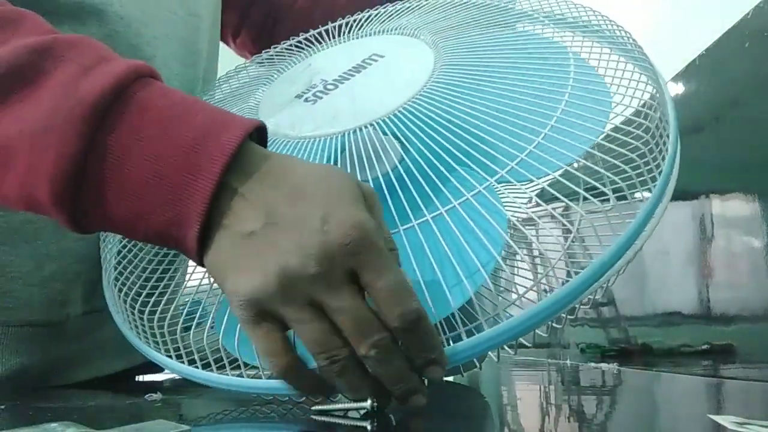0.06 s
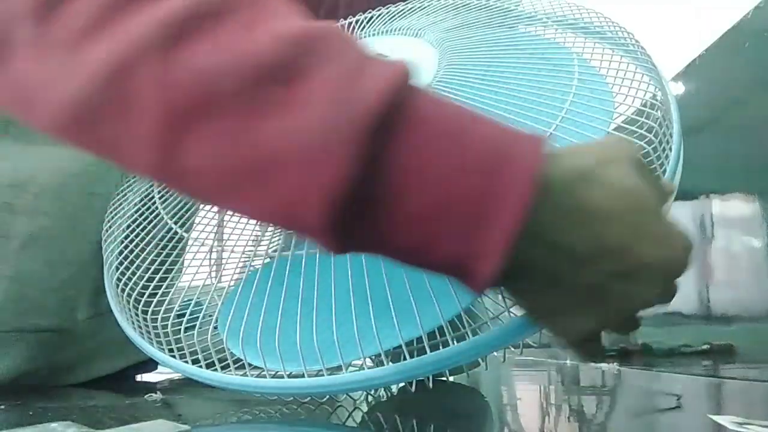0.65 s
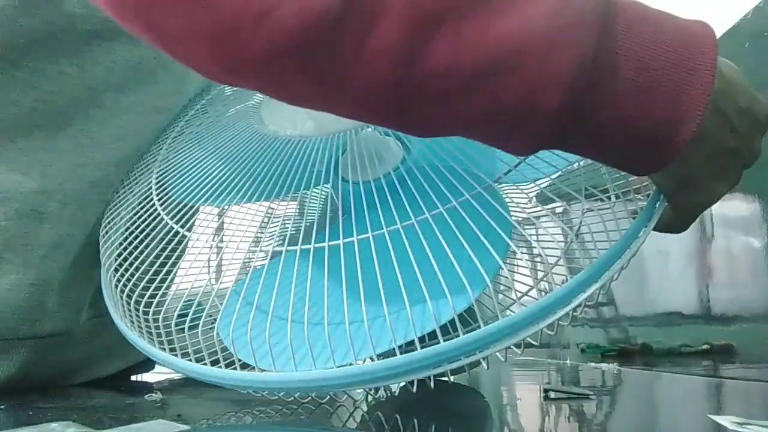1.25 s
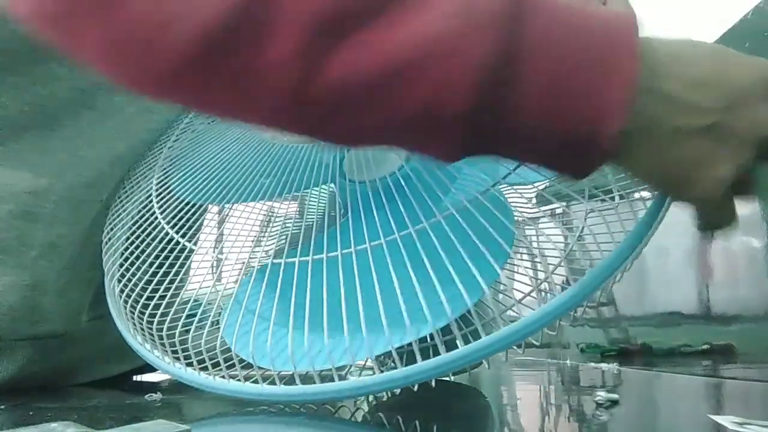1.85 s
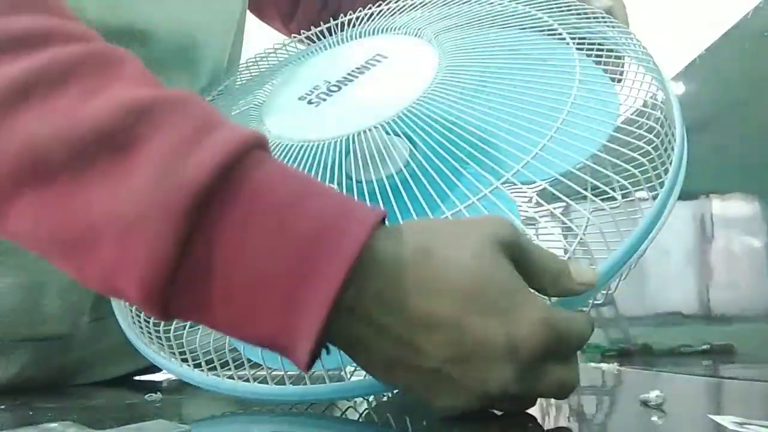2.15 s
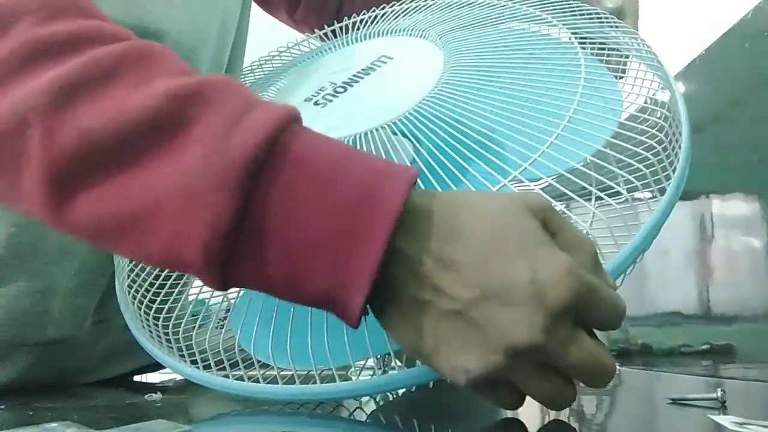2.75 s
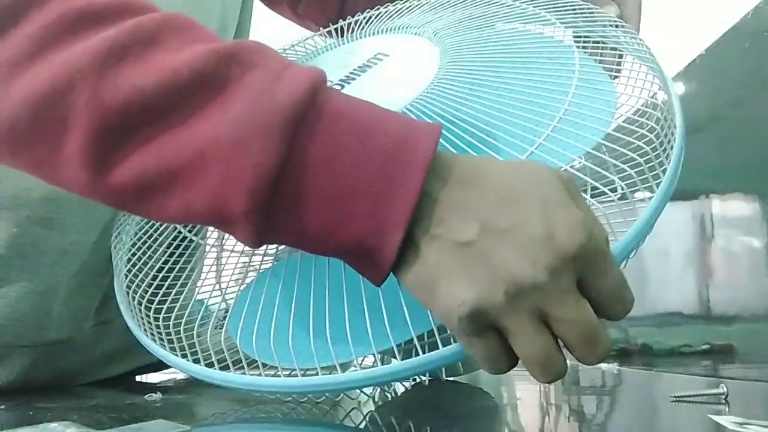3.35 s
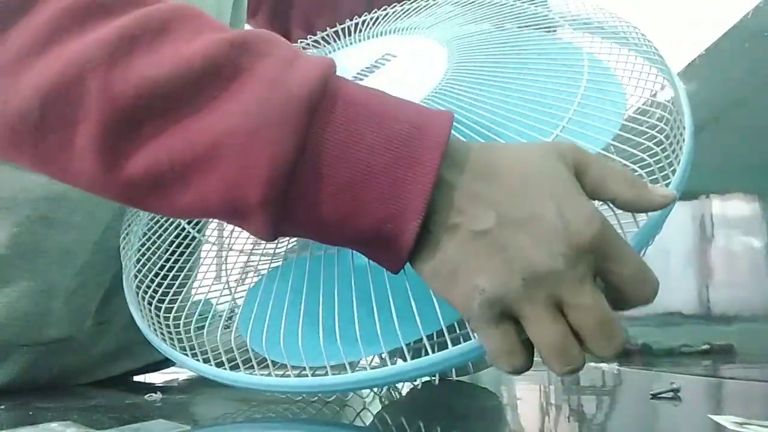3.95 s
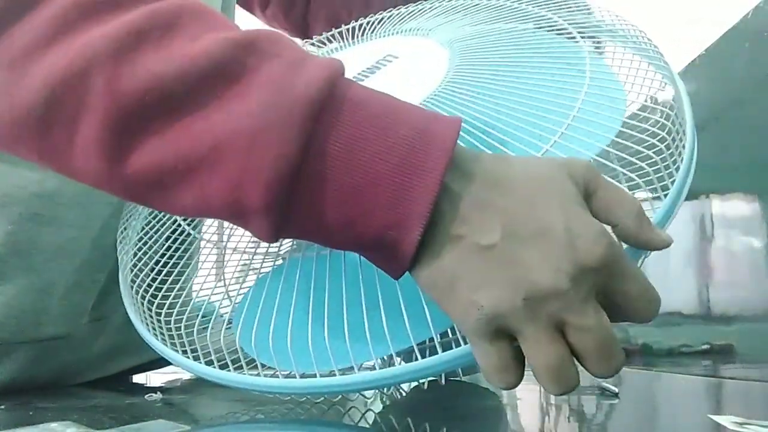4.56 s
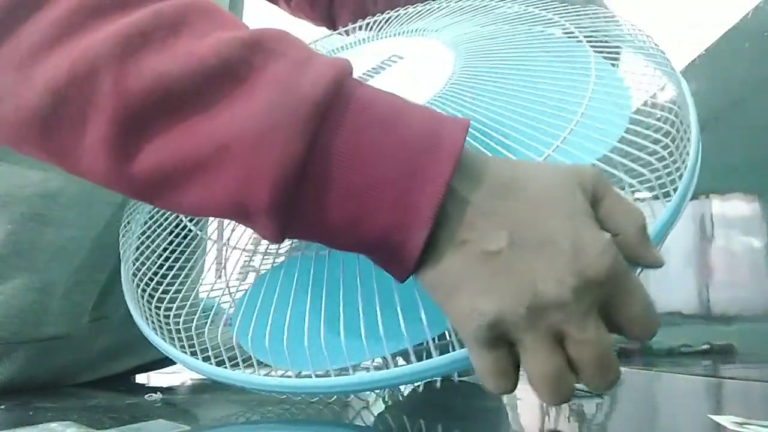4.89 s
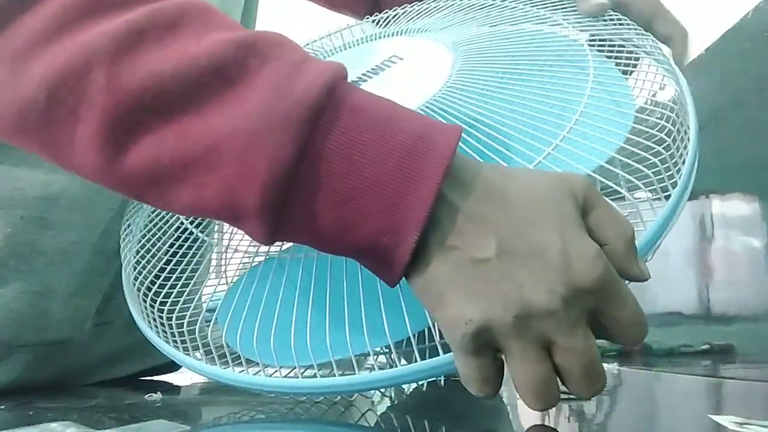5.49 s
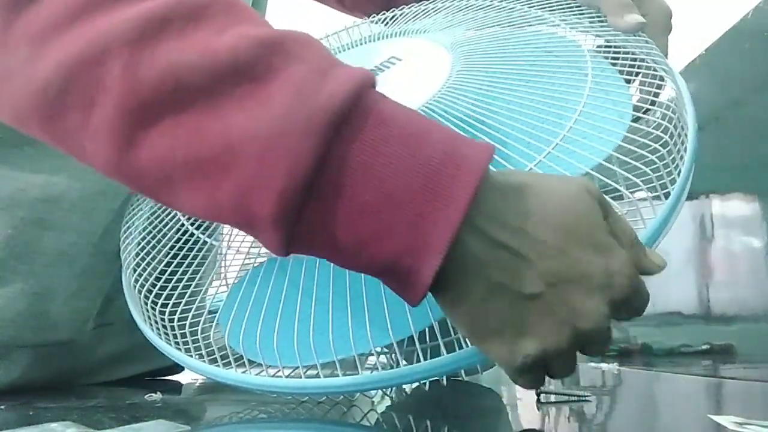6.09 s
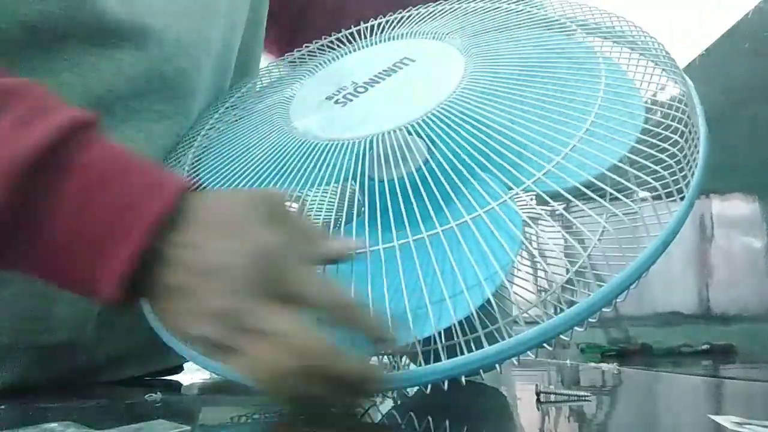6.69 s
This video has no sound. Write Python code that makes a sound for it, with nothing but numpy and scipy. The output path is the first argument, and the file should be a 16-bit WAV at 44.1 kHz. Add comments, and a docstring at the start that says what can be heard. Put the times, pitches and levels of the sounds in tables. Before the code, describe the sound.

A small screw drops onto a glass tabletop, bouncing in quickening clinks with a thin high ring, then rolls to and fro until it rests. Wire fan guards tick and bump softly as they are handled. A rim clip clicks shut, and about two seconds later another snaps much louder, leaving the cage ringing briefly. The microphone is close, in a bare, echoing room with faint background air noise.

```python
"""Dropped screw and fan guard clips

Two wire fan guards are pressed together on a glass tabletop in a bare, echoing room. A small screw
slips from the fingers, bounces, rings the glass and rolls to and fro until it rests. The wires tick
under the hands; two rim clips snap shut and shake the cage. A phone stands close by on the table."""
import sys
import numpy as np
from scipy import signal
from scipy.fft import rfft, irfft, next_fast_len
from scipy.io import wavfile

SR = 44100
rng = np.random.default_rng(int(sys.argv[2]) if len(sys.argv) > 2 else 0)


def store_wav(level_fs):
    """Save 16-bit WAV to argv[1]."""
    pcm = np.round(np.clip(np.atleast_2d(level_fs), -1, 1) * 32767)
    wavfile.write(sys.argv[1], SR, pcm.T.astype(np.int16))


N = 296793
T = np.arange(N) / SR

# Dull knock of wire and rim. Each row: frequency in Hz, level in dB.
WIRE_KNOCK = [(200, -10), (800, 4), (1400, 0.5), (2300, 0), (3800, -4), (5500, -16.5), (10000, -37.5)]


def amp(db):
    """Decibels to gain."""
    return 10 ** (np.asarray(db) / 20)


def unit(x):
    """Scale to rms 1."""
    return x / np.sqrt(np.mean(x ** 2))


def add(out, start_s, x):
    """Mix x into out at start_s."""
    i = max(int(start_s * SR), 0)
    out[:, i:i + x.shape[1]] += x[:, :N - i]


def colour(x, points):
    """Minimum-phase filter through (Hz, dB) points."""
    n = next_fast_len(x.shape[-1], True)
    hz, db = np.transpose(points)
    gain_db = np.interp(np.log(np.fft.rfftfreq(n, 1 / SR) + 1), np.log(hz), db)
    cepstrum = irfft(np.log(amp(gain_db)), n)
    cepstrum[1:n // 2] *= 2
    cepstrum[n // 2 + 1:] = 0
    return irfft(rfft(x, n) * np.exp(rfft(cepstrum)), n)[..., :x.shape[-1]]


def hump(hz, q):
    """(Hz, dB) points of one broad resonance."""
    ratio = np.geomspace(1 / 32, 32, 81)
    db = -10 * np.log10(1 + (q * (ratio - 1 / ratio)) ** 2)
    return np.transpose([hz * ratio, db * (1 + abs(np.log10(ratio)))])


def resonances(rows, blur_hz=0):
    """(Hz, dB) points of several steep resonances, each widened by blur_hz."""
    f = np.geomspace(100, SR / 2, 600)
    power = 0
    for hz, width_hz, db in rows:
        wide_hz = width_hz + blur_hz
        power += amp(db) ** 2 * width_hz / wide_hz / (1 + ((f - hz) / wide_hz) ** 2) ** 2
    return np.transpose([f, 10 * np.log10(power)])


def stereo_noise(n, alike, lag_samples=20, bass_hz=450):
    """Noise at two spaced microphones: later on the left, coherent in the bass, less so above."""
    f = np.fft.rfftfreq(n, 1 / SR)
    right, unrelated = rfft(rng.standard_normal((2, n)))
    coherence = 1 - (1 - alike) * (1 - np.exp(-(f / bass_hz) ** 2))
    left = coherence * right + np.sqrt(1 - coherence ** 2) * unrelated
    return irfft([left * np.exp(-2j * np.pi * f * lag_samples / SR), right], n)


def contact(spectrum, length_s, alike=0.33):
    """Brief coloured contact chatter with the energy of 4 ms at rms 1."""
    t = T[:next_fast_len(int(3 * length_s * SR) + 1024, True)]
    envelope = t * np.exp(-(t / length_s) ** 2)
    chatter = rfft(stereo_noise(len(t), alike, lag_samples=13.02) * envelope)
    flattened = irfft(chatter / (abs(chatter) + 1e-12) ** .6, len(t))  # so the object's colour leads
    burst = colour(flattened * (t < 3 * length_s), spectrum)
    return unit(burst) * np.sqrt(.004 * SR / len(t))


def strike(body, hardness_db, length_s, knock_db, clink_db, tick_db, tick_slope=1.31):
    """Small metal impact: a knock, with more clink and bright tick the harder the contact."""
    # Metal clink and contact tick. Each row: frequency in Hz, level in dB.
    clink_spectrum = [(2000, -20.5), (4500, -5.5), (5400, -2), (6400, -6.5), (8100, -0.5), (9500, -12),
                      (14000, -31.5)]
    tick_spectrum = [(3000, -30), (7000, -12), (8500, -2), (9500, -5), (10300, 1.5), (11500, -9.5),
                     (14500, -7.5)]
    knock = amp(knock_db) * contact(body, length_s)
    clink = amp(hardness_db + clink_db) * contact(clink_spectrum, length_s)
    tick = amp(tick_slope * hardness_db + tick_db) * contact(tick_spectrum, length_s)
    return knock + clink + tick


def ring(x, modes):
    """Decaying modes driven by x."""
    t = T[:SR]
    response = sum(amp(db) * np.exp(-np.log(1000) * t / t60_s) * np.sin(2 * np.pi * hz * t)
                   for hz, db, t60_s in modes)
    return signal.fftconvolve(x, unit(response)[None] / np.sqrt(SR), axes=1)[:, :N]


def cluster(modes, detune, count):
    """Split each mode into detuned copies that beat."""
    return [(hz * np.exp(detune * offset), db, t60_s)
            for hz, db, t60_s in modes for offset in rng.standard_normal(count)]


def near_wall(x, lag_s=0.0097, echo_db=-14):
    """x plus one distinct echo from the closest wall."""
    lag = int(lag_s * SR)
    return np.pad(x, ((0, 0), (0, lag))) + amp(echo_db) * np.pad(x, ((0, 0), (lag, 0)))


def reverb(x, build_s=0.0034):
    """Bare walls return a dense tail that builds fast and loses its treble first."""
    # Each row: frequency in Hz, T60 in seconds, level against the direct sound in dB.
    room_bands = [(99.5, 1, -6.5), (402, 1, 0.5), (1002, 1, -8), (2520, 0.93, -3.5), (5200, 1, -6),
                  (8240, 0.8, -10), (13950, 0.66, -7.5)]
    hz, t60_s, db = np.transpose(room_bands)
    f, t, noise = signal.stft(stereo_noise(SR, alike=.3), SR, nperseg=256)
    decay_s, wet_db = (np.interp(np.log(f + 1), np.log(hz), column)[:, None] for column in (t60_s, db))
    rate = np.log(1000) / decay_s
    tail = signal.istft(noise * amp(wet_db) * np.sqrt(2 * rate / SR) * np.exp(-rate * t), SR)[1]
    tail *= 1 - np.exp(-(T[:tail.shape[1]] / build_s) ** 2)
    return signal.fftconvolve(x, tail, axes=1)[:, :N]


def room_air(level_db=-55.5):
    """Steady, dark noise of the room's air."""
    # Each row: frequency in Hz, relative spectral density in dB.
    air_spectrum = [(25, -4.5), (60, -2), (140, -4.5), (260, -9), (330, -6.5), (450, -8.5), (800, -6),
                    (1020, -10.5), (1200, -19), (2400, -24), (3100, -32.5), (5000, -38), (7700, -35.5),
                    (14000, -49.5)]
    return amp(level_db) * unit(colour(stereo_noise(N, alike=0.33, lag_samples=19.94), air_spectrum))


def table_rocking(peak_s=0.33, peak_db=-40, rest_db=-57.5, rise_db_per_s=8.5, fall_db_per_s=4.5):
    """A reaching arm rocks the table under the phone; the rumble swells, then settles."""
    # Each row: frequency in Hz, level in dB.
    rumble_spectrum = [(10, -14.5), (22, 5.5), (32, -1), (50, -10.5), (90, -16), (200, -23.5), (600, -61)]
    rise_db = peak_db + rise_db_per_s * (T - peak_s)
    settle_db = np.maximum(peak_db - fall_db_per_s * (T - peak_s), rest_db)
    rumble = unit(colour(stereo_noise(N, alike=0.34, bass_hz=14), rumble_spectrum))
    return amp(np.minimum(rise_db, settle_db)) * rumble


def scuffs(grain_db=4):
    """Fingers, sleeve and screw rub on wire and glass in short grainy swells."""
    # Each row: midpoint in seconds, level in dB, centre in Hz, half length in seconds.
    rubs = [(0.162, -59, 6940, 0.009), (0.482, -58, 2100, 0.031), (1.339, -47, 7100, 0.0038),
            (1.561, -50, 7800, 0.02), (2.453, -69, 6500, 0.014), (3.812, -66, 8000, 0.0085),
            (5.101, -76.5, 8940, 0.11)]
    out = np.zeros((2, N))
    for mid_s, db, hz, half_s in rubs:
        t = T[:int(6 * half_s * SR)] - 3 * half_s
        grain = amp(grain_db * np.interp(t, np.linspace(t[0], t[-1], 64), rng.standard_normal(64)))
        rub = unit(colour(stereo_noise(len(t), alike=0.28) * grain, hump(hz, q=2.2)))
        add(out, mid_s + t[0], amp(db) * rub * np.exp(-(t / half_s) ** 2))
    return out


def wire_ticks(pitch_spread=.1):
    """Wires and screw tap lightly, each time at another spot and so at another pitch."""
    # Each row: start in seconds, level in dB, hardness in dB, length in seconds.
    taps = [(0.154, -49, -8, .002), (0.512, -44.5, -7, 0.0027), (1.071, -47, -3, .002),
            (1.1, -41, -13, .002), (1.141, -41.5, -7, 0.0019), (1.178, -45, -11, .004),
            (1.201, -41, -10, 0.0029), (1.239, -45.5, -1, .0023), (1.332, -41, -1.5, 0.0031),
            (1.355, -39.5, -16, .003), (1.468, -38.5, -17, 0.0078), (1.565, -46, 0.5, .003),
            (1.629, -39.5, -14, .007), (1.752, -40.5, -22, 0.0076), (1.821, -41.5, -12, 0.0051),
            (1.97, -46, -19, 0.0027), (2.05, -42, -20, 0.0056), (2.236, -47, -15.5, .007),
            (2.339, -51, -27, 0.0046), (2.578, -51.5, -23, .005), (2.703, -48.5, -26, .0025),
            (2.979, -50.5, -17, .0025), (3.398, -50, -17, .002), (3.627, -52.5, -27.5, 0.0033),
            (3.779, -51.5, -15, .002), (3.804, -46.5, -14, 0.0023), (3.993, -49.5, -19, 0.0029),
            (4.916, -50.5, -9.5, 0.0054)]
    out = np.zeros((2, N))
    for (start_s, db, hardness_db, length_s), spot in zip(taps, rng.standard_normal(len(taps))):
        body = np.array(WIRE_KNOCK) * [np.exp(pitch_spread * spot), 1]
        tap = strike(body, hardness_db, length_s, knock_db=-5, clink_db=-0.5, tick_db=-5.5)
        add(out, start_s, amp(db) * tap)
    return out


def cage_bumps(hum_db=-25):
    """Dull jolts leave the wire cage humming, unless a hand damps it."""
    # Each row: start in seconds, level in dB, centre in Hz, length in seconds, ring gain in dB.
    bumps = [(1.235, -40, 293, 0.028, -1), (1.562, -41, 116, 0.0089, -4), (2.165, -40.5, 147.8, 0.021, -9),
             (3.073, -45.5, 700.2, 0.013, -21.5), (3.797, -43, 119, 0.011, -4.5),
             (3.806, -42.5, 790, 0.0082, -18), (4.271, -45.5, 75.4, 0.024, 10.5),
             (4.274, -34.5, 180, 0.023, -5), (4.272, -27.5, 746, 0.0087, -11), (4.274, -40, 400, 0.011, 4),
             (4.261, -36, 1260, 0.0091, -6), (6.266, -35, 113, 0.0054, -21),
             (6.268, -32.5, 216, 0.006, -11.5), (6.272, -31, 310, 0.021, -0.5),
             (6.274, -39, 455, .014, 8.5), (6.275, -36.5, 880, 0.016, -7)]
    # Each row: frequency in Hz, level in dB, T60 in seconds.
    cage_modes = [(74.3, -2, 1.93), (155.6, 2.5, 0.76), (204, 0.5, 0.61), (235.3, -12, 0.77),
                  (315.5, -3.5, 1), (367, -5.5, 0.6), (400, -1.5, 0.92), (435, -3.5, 1.2), (576, 2, 0.51),
                  (774, -1, 0.79), (910, 5, 0.56)]
    jolts, pushes = np.zeros((2, 2, N))
    for start_s, db, hz, length_s, ring_db in bumps:
        add(jolts, start_s, amp(db) * contact(hump(hz, q=4.4), length_s, alike=0.58))
        push = colour(signal.unit_impulse((1, 4096)), hump(hz, q=.6))
        add(pushes, start_s, amp(db + ring_db) * unit(push))
    # The guards are not quite alike or round, so each mode has beating neighbours.
    neighbours = [(hz, db - 5, t60_s) for hz, db, t60_s in cluster(cage_modes, detune=0.04, count=3)]
    return jolts + amp(hum_db) * ring(pushes, cage_modes + neighbours)


def clip_snaps(walls_db=-0.43, wires_db=-14, pan_right_db=1.4):
    """Spring clips click, knock the rim and ring the wires; the walls return a blurred version."""
    # Each row: start in seconds, clip index, click in dB, rim knock in dB, length in seconds.
    snaps = [(4.263, 0, -41.5, -47.5, 0.0027), (4.269, 0, -46, -49, 0.0027),
             (4.2733, 0, -29.5, -40.5, 0.0012), (4.275, 0, -35, -45, 0.0029),
             (4.2805, 0, -37, -43.5, 0.0037), (6.231, 1, -49, -57.5, 0.0035),
             (6.2706, 1, -13.5, -27, 0.0019), (6.2721, 1, -13, -23, 0.0025), (6.2783, 1, -26, -41, 0.0023)]
    # One list per clip. Each row: frequency in Hz, width in Hz, level in dB.
    clip_resonances = [
        [(3400, 320, -10.5), (5800, 370, -3), (6370, 310, -6), (7200, 310, 0.5), (7960, 700, 0.5),
         (9300, 960, -8), (10300, 500, -8), (11600, 1140, -14), (13500, 1500, -16)],
        [(3130, 330, -14), (5620, 510, -4), (6130, 160, -9.5), (7100, 400, -0.5), (8040, 230, 6),
         (8800, 350, 1), (9350, 540, -5), (10100, 450, -4), (10900, 640, -5.5), (12740, 600, -10.5),
         (14200, 600, -10)],
    ]
    # Each row: frequency in Hz, level in dB.
    rim_spectrum = [(150, 5), (400, -4), (750, 1), (1000, 0), (1350, -11), (1700, 11), (2000, -5),
                    (2340, 8.5), (2700, -6), (3100, -5), (3700, -2), (4400, -11), (12000, -58)]
    # Groups of wires of nearly equal length. Each row: frequency in Hz, level in dB, T60 in seconds.
    wire_modes = [(2180, 0, 0.89), (5450, 0, 0.41), (7600, 3, 0.3), (10300, -1, .35)]
    direct, diffuse = np.zeros((2, 2, N))
    pan_db = np.array([[-pan_right_db], [pan_right_db]])
    for start_s, index, click_db, knock_db, length_s in snaps:
        peaks = clip_resonances[index]
        click = amp(click_db + pan_db) * contact(resonances(peaks), length_s, alike=0.074)
        knock = amp(knock_db) * contact(rim_spectrum, length_s, alike=0.14)
        add(direct, start_s, click + knock)
        blurred_click = amp(click_db) * contact(resonances(peaks, blur_hz=500), length_s)
        dull_knock = amp(knock_db) * contact(WIRE_KNOCK, length_s)
        add(diffuse, start_s, blurred_click + dull_knock)
    wires = ring(direct, cluster(wire_modes, detune=0.065, count=24))
    return near_wall(direct)[:, :N] + amp(wires_db) * wires + amp(walls_db) * reverb(diffuse)


def glass_ring(drive, level_db=-16):
    """The glass plate rings under the screw's contacts."""
    # Each row: frequency in Hz, level in dB, T60 in seconds.
    plate_modes = [(375, -3.5, 0.6), (780, 2, 0.19), (908, -2.5, .25), (1032, 3, 0.16), (1090, 0.5, 0.3),
                   (1240, -3, 0.17), (1845, 0, 0.1), (2435, -0.5, 0.17)]
    return amp(level_db) * ring(drive, plate_modes)


def screw_roll(peak_taps_per_s=195, db_per_doubling=45, jitter=.3, scatter_db=2, wobble_hz=6.1):
    """The uneven head taps the glass in a fast train, quicker and louder in each swing."""
    # Swings to and fro, fading as the screw slows. Each row: time in seconds, level in dB.
    swings = [(1.025, -47), (1.13, -45), (1.21, -45.5), (1.25, -47.5), (1.32, -43), (1.37, -48),
              (1.44, -55.5), (1.54, -46), (1.6, -56), (1.69, -51), (1.8, -57.5), (1.87, -56), (2.02, -62),
              (2.48, -67.5)]
    # Each row: frequency in Hz, level in dB.
    roll_spectrum = [(150, -20), (380, -1), (600, 2), (850, 3.5), (1250, -0.5), (1700, 4.5), (2400, 2.5),
                     (3200, -8), (4200, -5), (5200, -10.5), (6300, -9.5), (8000, -14), (11000, -23.5),
                     (14000, -44)]
    times_s, levels_db = np.transpose(swings)
    out, now_s = np.zeros((2, N)), times_s[0]
    for gap, size in rng.standard_normal((400, 2)):
        if now_s < times_s[-1]:
            db = np.interp(now_s, times_s, levels_db)
            sway = 1 + 0.05 * np.sin(2 * np.pi * wobble_hz * now_s)  # colour sways as the head turns
            tap = contact(np.array(roll_spectrum) * [sway, 1], length_s=0.00312)
            add(out, now_s, amp(db + scatter_db * size) * tap)
            slowing = 2 ** ((levels_db.max() - db) / db_per_doubling)
            now_s += np.exp(jitter * gap) / peak_taps_per_s * slowing
    return out


def screw_ring(hits, level_db=-12.5, tumble_hz=22, tumble_peak_s=0.83, tumble_db=3):
    """The shank rings high in the air, throbbing as it tumbles towards the phone and away."""
    # Each row: frequency in Hz, level in dB, T60 in seconds.
    shank_modes = [(10100, -5, 0.16), (10040, -3.5, 0.078), (10200, -5.5, 0.074)]
    # Freedom to ring once out of the fingers. Each row: time in seconds, gain in dB.
    freedom = [(0.66, -18.5), (0.69, -2.5), (0.75, 5), (0.8, -2), (0.87, -10), (1.0, 5)]
    drive = hits * amp(np.interp(T, *np.transpose(freedom)))
    tumble = amp(tumble_db * np.cos(2 * np.pi * tumble_hz * (T - tumble_peak_s)))
    return amp(level_db) * tumble * ring(drive, shank_modes)


def screw_bounces(tip_lag_s=.0021, tip_db=-5.5, spot_db=4.5, spot_octaves=.4, muffle_hz=2800):
    """Head, then tip, hit the glass in quickening bounces, duller when soft, coloured by the spot."""
    # Each row: start in seconds, level in dB, hardness in dB, pitch the spot favours in Hz.
    bounces = [(0.543, -26, -19, 2400), (0.5693, -31.5, -22, 2410), (0.634, -35, -18, 1000),
               (0.65, -33, -17, 3900), (0.697, -18, -9.5, 1550), (0.747, -26, -11, 1040),
               (0.787, -23.5, -9, 750), (0.865, -24, -10, 1540), (0.902, -28, -13.5, 2400),
               (0.917, -28.5, -8, 800), (0.937, -35, -8, 2006), (0.949, -33.5, -7, 2000),
               (0.969, -34.5, -7, 2000), (0.979, -31.5, -7.5, 1100), (0.997, -33, -12, 800),
               (1.011, -33.5, -12, 2000)]
    # Each row: frequency in Hz, level in dB.
    glass_knock = [(100, -17), (250, -8.5), (400, 2), (630, -2), (790, 6), (1050, 3.5), (1350, 2.5),
                   (2500, 2), (3700, 0.5), (4500, -5.5), (10000, -39.5)]
    hz, glass_db = np.transpose(glass_knock)
    hits = np.zeros((2, N))
    for start_s, db, hardness_db, spot_hz in bounces:
        boost_db = spot_db * np.exp(-(np.log2(hz / spot_hz) / spot_octaves) ** 2)
        muffle_db = min(hardness_db + 10, 0) * (hz > muffle_hz)
        body = np.transpose([hz, glass_db + boost_db + muffle_db])
        for lag_s, end_db in ((0, 0), (tip_lag_s, tip_db)):
            hit = strike(body, hardness_db, length_s=.0025, knock_db=-5, clink_db=4.5, tick_db=-3)
            add(hits, start_s + lag_s, amp(db + end_db) * hit)
    return hits + screw_ring(hits)


def scene():
    """Screw, glass, wires and clips in one room, over air and table rumble."""
    screw = screw_bounces() + screw_roll()
    near = near_wall(screw + glass_ring(screw) + wire_ticks() + cage_bumps() + scuffs())
    return near[:, :N] + reverb(near) + clip_snaps() + room_air() + table_rocking()


def record(dry):
    """The phone clips at full scale and low-passes at 14.2 kHz."""
    lowpass = signal.ellip(10, .2, 70, 14200, fs=SR, output="sos")
    return signal.sosfilt(lowpass, np.clip(dry, -1, 1))


dry = scene()
out = record(dry)
store_wav(out)
```